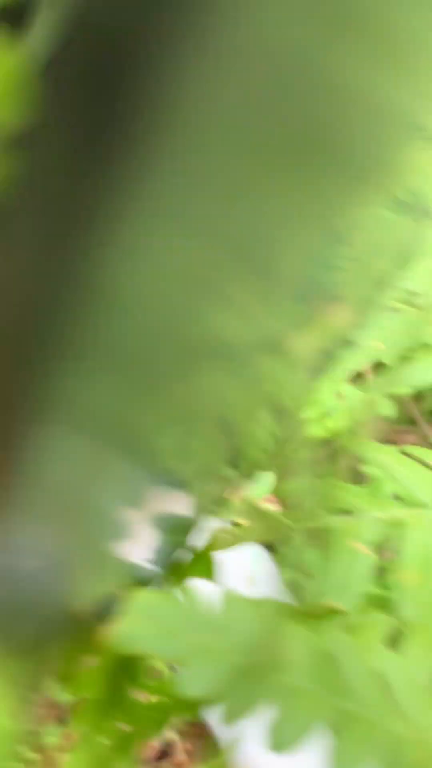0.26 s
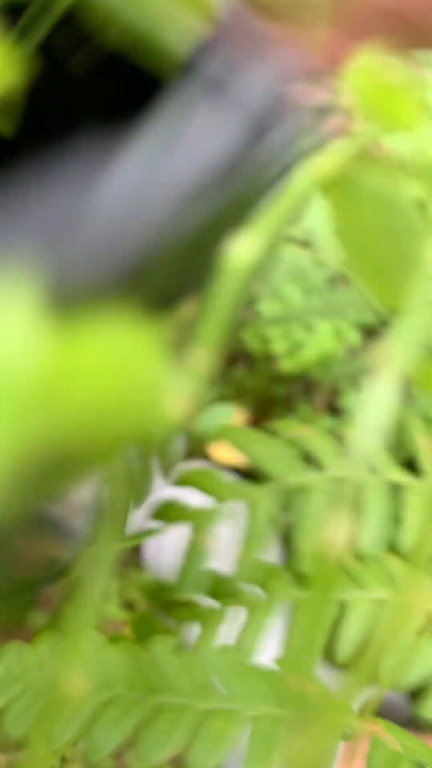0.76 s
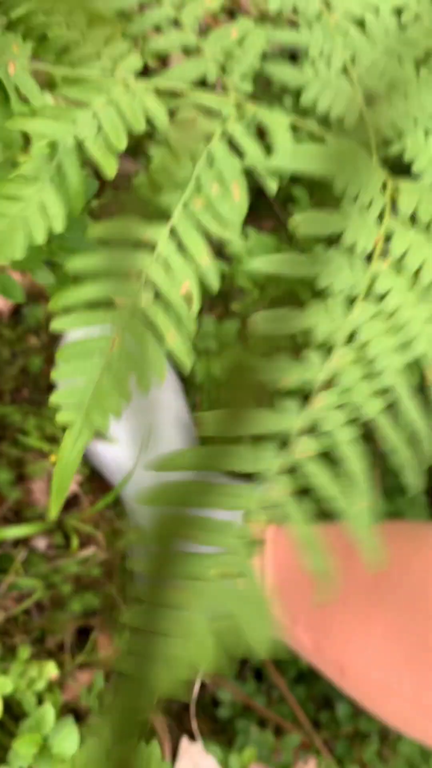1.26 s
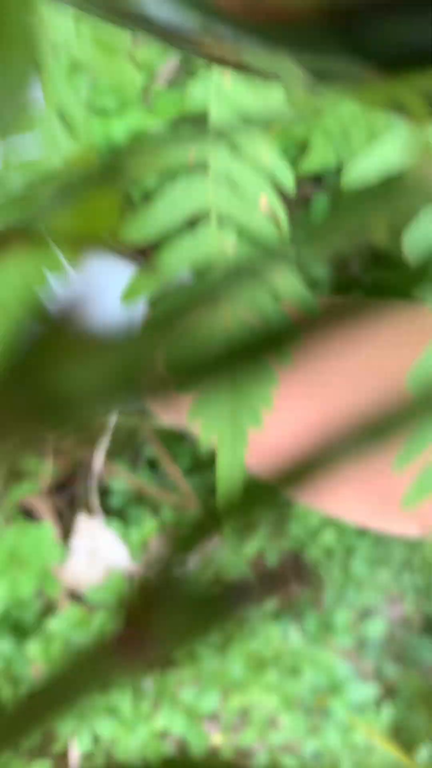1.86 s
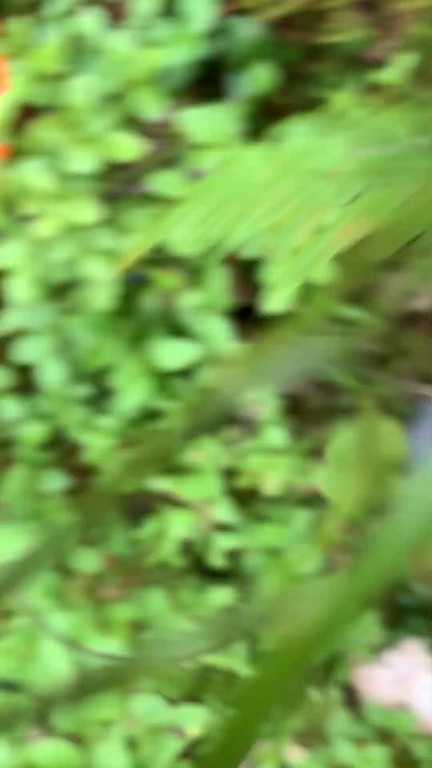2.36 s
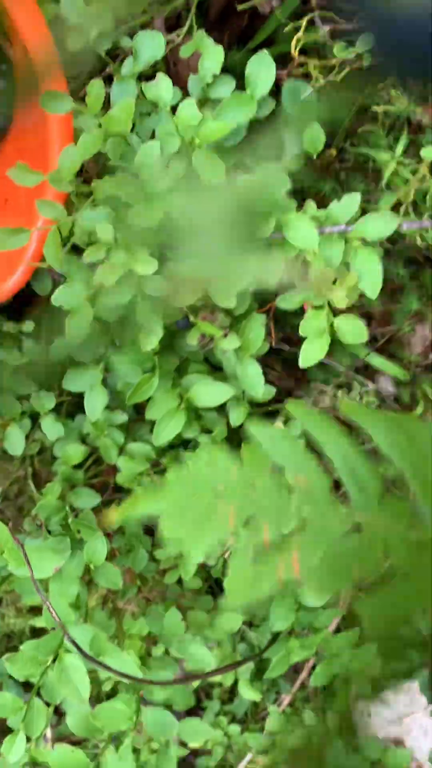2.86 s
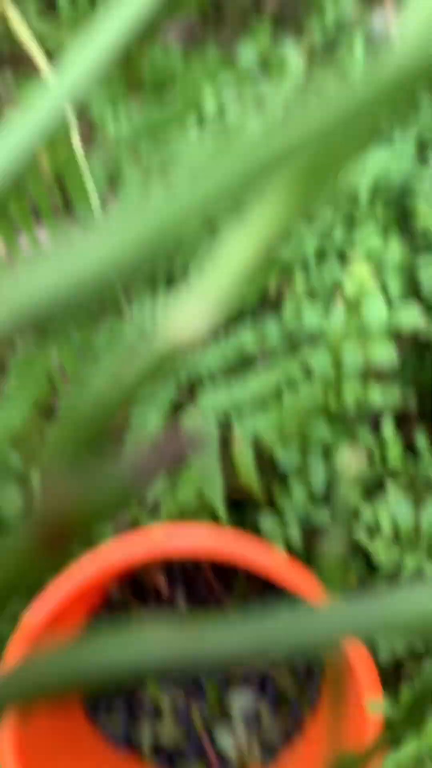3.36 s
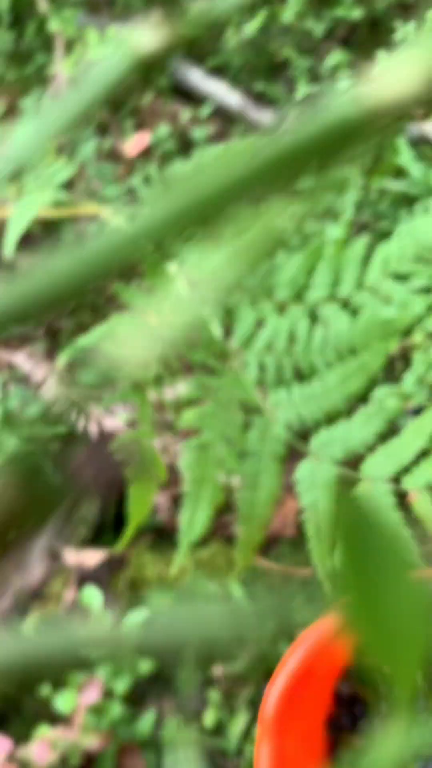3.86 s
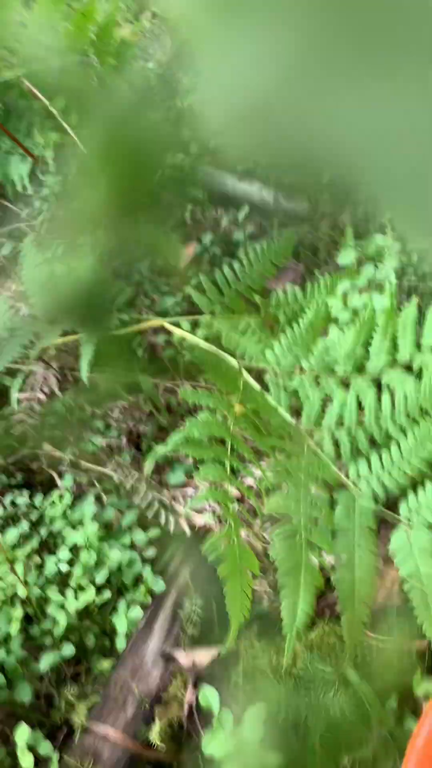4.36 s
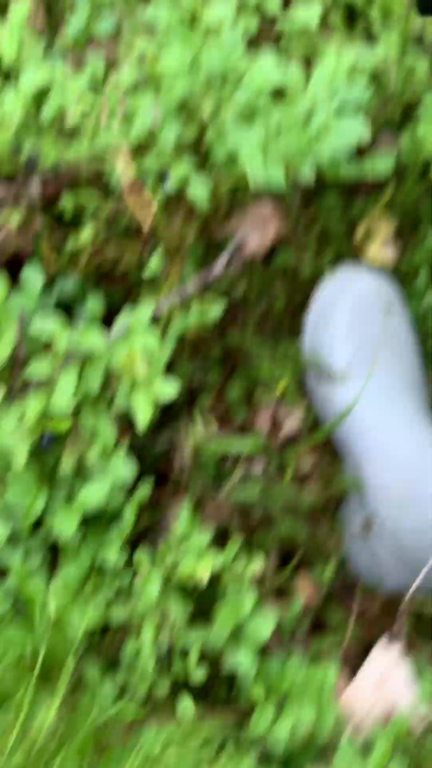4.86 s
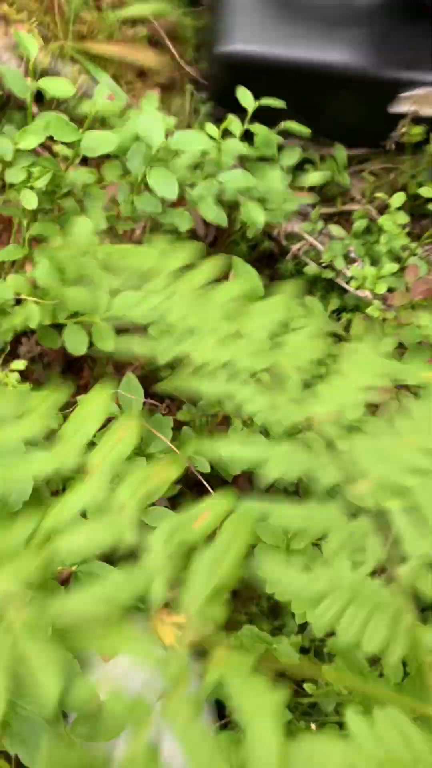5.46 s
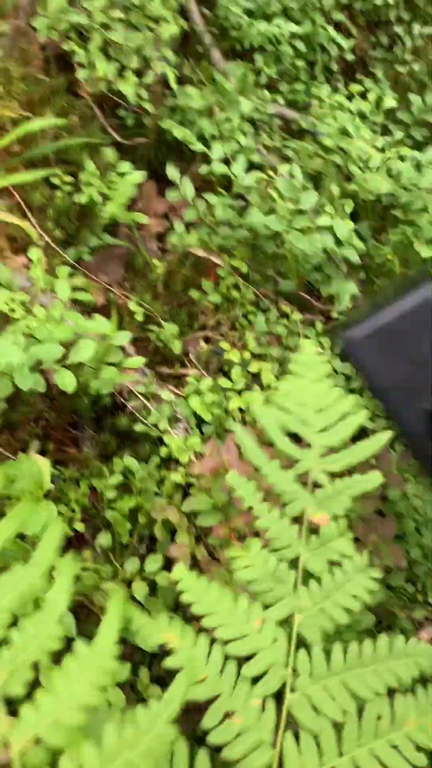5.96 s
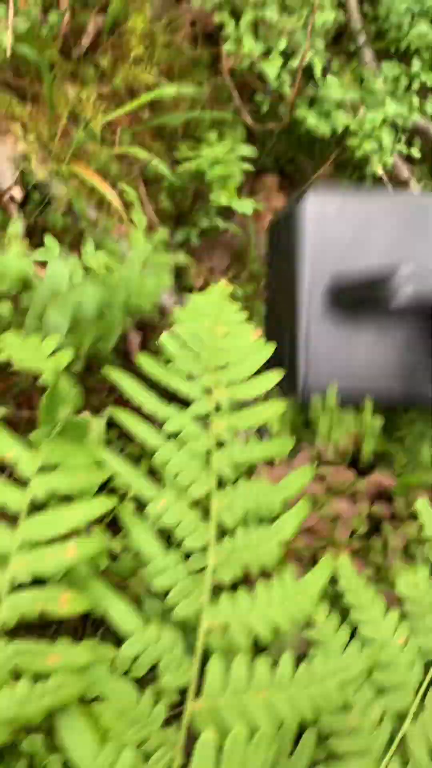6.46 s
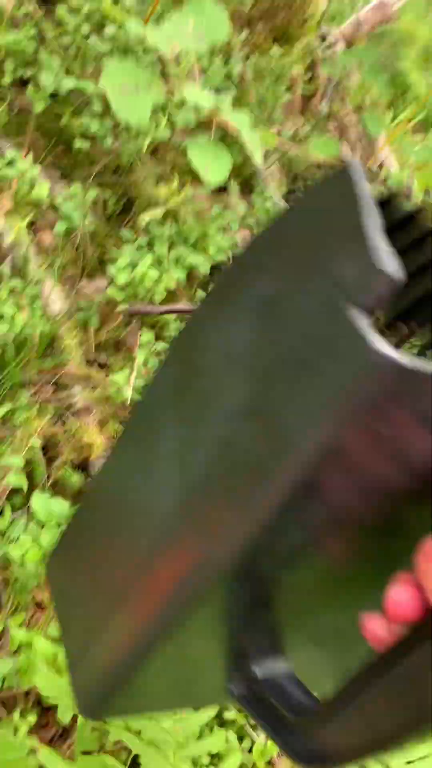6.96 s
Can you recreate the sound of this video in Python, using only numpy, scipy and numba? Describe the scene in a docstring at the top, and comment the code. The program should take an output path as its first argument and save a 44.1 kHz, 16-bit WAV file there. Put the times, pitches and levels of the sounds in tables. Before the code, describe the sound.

Very close, a person in rubber boots pushes through ferns and berry shrubs carrying a plastic bucket and scoop. A hard clatter of knocks and snapping stalks comes almost at once, then leafy swishes rise and fall unevenly, with stems scraping plastic, hollow bucket tones and woody snaps. Dull boot thuds cluster near three seconds. Later it thins to brighter fern hiss. Low handheld microphone, wide stereo, dry quiet forest.

```python
"""Ferns and berry shrubs swish and crackle as someone in rubber boots wades through, carrying a bucket and a scoop.
Leaves are band-filtered noise and clicks; stems are clicks that ring plastic; hollow air is clicks in moving resonators.
Stalks crack as fading bursts of fibre noise, knocks are falling tones, and boots in moss are low, irregular thuds.
A phone held low among the leaves hears each side of the path with a different phase between its two ports.
A faint scattered tail and steady noise of still forest air lie behind."""
import sys
import numpy as np
from scipy import signal
from scipy.fft import rfft, irfft
from scipy.io import wavfile
from numba import njit

SR = 44100
rng = np.random.default_rng(int(sys.argv[2]) if len(sys.argv) > 2 else 0)


def to_wav(s):
    """Save 16-bit WAV."""
    ch = np.atleast_2d(s).T  # columns
    pcm = np.round(np.clip(ch, -1, 1) * 32767)  # PCM
    wavfile.write(sys.argv[1], SR, pcm.astype(np.int16))


N = 317520
TIME = np.arange(N) / SR  # s
COARSE_TIME = TIME[::32]  # s, fine enough for the slow contact levels
FREQ = np.arange(N // 2 + 1) * SR / N  # Hz

# All levels in the tables are relative; the gains in the functions trim them.
# A leg or arm pushes through a clump: (peak time [s], rise [s], fall [s], leaves level [dB],
# stems on plastic level [dB], air in the bucket level [dB], grip on the phone level [dB])
SWEEPS = [(.185, .19, .3, -46, -53, -36.5, -37), (.36, 0.12, 0.45, -58, -50.5, -48, -55.5),
          (.808, 0.13, .14, -34.5, -30, -55, -42.5), (1.6, 0.27, 0.25, -45, -41.5, -48.5, -49.5),
          (1.825, 0.12, 0.2, -41, -39.5, -41.5, -41), (2.128, 0.096, 0.36, -47, -46, -51, -48.5),
          (2.448, 0.21, 0.14, -44, -41, -47, -53), (2.725, 0.072, .12, -42, -37.5, -40, -41.5),
          (2.995, 0.17, 0.13, -34.5, -35.5, -41.5, -40.5), (3.641, 0.098, 0.2, -45.5, -39, -37.5, -44),
          (3.8, 0.2, 0.085, -37, -37, -53, -51.5), (4.415, 0.12, .14, -33.5, -32.5, -47, -42.5),
          (4.65, .3, 0.16, -52, -52.5, -57.5, -58.5), (5.014, 0.038, .13, -56, -56, -69, -68),
          (5.22, 0.19, 0.12, -53, -66, -75, -66), (5.555, .3, 0.16, -42, -42, -47.5, -67),
          (6.405, 0.2, 0.22, -41, -37.5, -50.5, -74), (6.59, 0.4, 0.083, -55.5, -53, -41.5, -67.5),
          (6.914, 0.19, 0.27, -42.5, -49, -58.5, -71)]
# Single fronds brush past: (peak time [s], fall [s], leaves level [dB], stem on plastic level [dB])
FRONDS = [(0.02, 0.18, -50, -58), (0.234, 0.02, -44, -50), (0.334, 0.032, -51.5, -34),
          (0.445, 0.048, -41.5, -36), (0.499, 0.028, -42, -57), (.635, .07, -43, -46),
          (1.042, 0.16, -45.5, -46.5), (1.38, 0.084, -52, -51), (1.48, 0.21, -45.5, -69),
          (1.65, 0.062, -49, -36), (1.961, 0.035, -42.5, -43), (2.036, 0.041, -43.5, -33),
          (2.087, .025, -46.5, -43), (2.333, 0.046, -54.5, -42), (2.639, 0.12, -42, -41.5),
          (2.928, .04, -39, -37), (3.102, 0.038, -40.5, -39), (3.168, .12, -50, -40),
          (3.271, 0.084, -50, -44.5), (3.368, 0.063, -49, -52), (3.45, .1, -52.5, -48),
          (3.53, .08, -44.5, -36.5), (3.89, .05, -48.5, -42), (3.954, 0.06, -48.5, -44),
          (4.07, 0.14, -56, -49), (4.186, 0.079, -41.5, -40.5), (4.315, 0.065, -40.5, -33),
          (4.826, .12, -45, -68.5), (4.933, 0.053, -48, -61.5), (5.424, 0.049, -50.5, -64),
          (5.73, 0.069, -52, -53.5), (5.808, 0.034, -54.5, -55), (6.06, 0.062, -49, -80),
          (6.12, 0.079, -51, -60.5), (6.237, 0.21, -46.5, -56.5), (6.389, 0.043, -36.5, -48),
          (6.484, 0.03, -39.5, -36.5), (6.74, 0.028, -53, -51)]
# Between pushes: (leaves level [dB], stems level [dB], bucket level [dB], grip level [dB])
REST_LEVELS = (-67, -63.5, -78.5, -72.5)
# Leaf spectrum: (frequency [Hz], relative density [dB])
LEAF_SPECTRUM = [(150, -27), (500, -15.5), (1200, 0), (1700, 2), (2500, -1), (4000, 4.5), (5800, 2.5),
                 (8800, -0.5), (11000, 2), (16000, -1.5)]
# Soft ferns hiss more brightly than woody shrubs: (time [s], rustle tilt [dB per octave])
LEAF_TILT = [(0, -0.5), (2.4, -4.2), (3.0, -2.9), (3.6, -2), (4.4, -3), (4.85, -1.5), (5.2, 1),
             (5.55, -1.5), (5.95, 2), (6.35, -3.5), (6.6, 1), (6.9, -0.5), (7.2, -3)]
# Spectrum of stems rubbing plastic: (frequency [Hz], relative density [dB])
SCRAPE_SPECTRUM = [(200, -19), (450, 2), (700, -10), (1200, -7), (2200, -1.5), (4000, -47), (9000, -41)]
# Modes of the hollow plastic: (frequency [Hz], width [Hz], level [dB])
PLASTIC_MODES = [(427.6, 96, 4), (621, 22, -1.5), (873, 34, 2), (993, 42, 3), (1430, 71, 3.5),
                 (1604, 100, 1.5), (1882, 190, 1), (2400, 230, 0), (2700, 39, -6.5), (3280, 130, -1)]
# Twigs and stalks cracking: (time [s], level [dB], woody band relative to treble [dB], 60 dB decay [s])
CRACKS = [(0.0698, -24.5, -29, 0.074), (0.1067, -33, 4.5, 0.036), (0.1588, -9, 2.5, 0.01),
          (0.18, -24, 2, 0.032), (0.24, -22.5, -20, 0.0098), (0.297, -29.5, -18, 0.026),
          (0.353, -31, -4, 0.014), (0.7883, -28, -14, 0.04), (0.8946, -16.5, -21, 0.0045),
          (0.9926, -22.5, -13, 0.0066), (1.018, -29, -32, 0.085), (1.0595, -29, -25, 0.07),
          (1.3533, -36, -3, 0.033), (1.544, -27, -18, 0.0055), (1.628, -26, -9, 0.041),
          (1.822, -25.5, 2.5, 0.027), (1.9305, -29, 0.5, 0.031), (2.143, -27.5, -6.5, 0.042),
          (2.314, -31, -3, 0.033), (2.364, -22.5, -4, 0.0072), (2.679, -18, 7, 0.04),
          (2.758, -27.5, -8, 0.029), (2.9666, -26, -14, 0.033), (3.157, -32.5, -17, 0.022),
          (3.372, -35, -17, 0.0096), (3.5486, -19, 10.5, 0.011), (3.881, -38.5, 9, 0.044),
          (4.297, -24, -9, 0.012), (4.374, -21, -9, 0.054), (4.684, -28.5, -3, 0.047),
          (4.8027, -33.5, -18, 0.066), (5.542, -27, -23, 0.033), (5.7005, -29, -0.5, 0.0089),
          (5.729, -45, -7, 0.013), (6.037, -35.5, -21, 0.016), (6.555, -24.5, -3.5, 0.0049)]
# Bundles of stalks crushed or dragged near the phone: (time [s], length [s], rms level [dB],
# lowest frequency [Hz], highest frequency [Hz])
CRUNCHES = [(0.002, 0.04, -47.5, 547, 1140), (0.071, 0.013, -34, 110, 610), (0.097, 0.023, -39, 500, 1400),
            (0.135, 0.029, -37.5, 700, 1590), (0.1576, 0.0024, -17.5, 2670, 3650),
            (0.163, .011, -18.5, 200, 1010), (0.165, 0.0075, -23, 1300, 3360),
            (0.179, .016, -24.5, 400, 1790), (0.211, 0.045, -37, 648, 1280), (0.306, 0.016, -35, 350, 1290),
            (0.323, 0.024, -32.5, 545, 1730), (0.354, 0.011, -26, 674, 1740),
            (0.513, 0.069, -46.5, 630, 1390), (0.637, 0.034, -44.5, 546, 1140),
            (0.752, 0.013, -42.5, 129, 700), (0.798, 0.025, -43, 129, 900),
            (1.775, 0.039, -44.5, 250.4, 2200), (1.819, 0.035, -40, 270, 1510),
            (2.017, 0.037, -38, 403, 2400), (2.077, 0.019, -46.5, 301, 1405),
            (2.324, 0.016, -47.5, 301, 890), (2.674, 0.024, -33, 131.5, 638),
            (2.977, 0.042, -42, 400, 1272), (3.041, 0.036, -41.5, 248, 1010),
            (3.149, 0.032, -43.5, 2640, 4200), (3.932, 0.07, -48.5, 166, 500),
            (4.085, 0.081, -52, 220.8, 525), (4.16, 0.043, -49, 977, 2090),
            (4.311, 0.037, -42.5, 1200, 2200), (4.686, 0.018, -52, 90, 904),
            (5.721, 0.013, -49.5, 950, 2220), (5.886, 0.05, -50.5, 59.3, 815),
            (6.368, 0.047, -38, 1400, 1870), (6.442, 0.078, -42, 600, 1220),
            (6.553, 0.044, -43.5, 480, 1050), (7.083, 0.028, -41, 48.7, 336)]
# Stems and boots knocking on phone, bucket and scoop: (time [s], level [dB], first pitch [Hz],
# last pitch [Hz], time to peak [s], share through the air, not the phone's body [0-1, clipped])
KNOCKS = [(0.0769, -23.5, 900, 520, 0.002, 0), (0.109, -29, 715, 252, 0.0051, 0),
          (0.1628, -7, 1630, 1310, 0.00089, .3), (0.1632, -9, 1005, 790, 0.0029, 0),
          (0.1635, -7.5, 656, 554, 0.003, 0.05), (.183, -15.5, 908, 577, 0.003, 0),
          (0.296, -21, 1095, 130, 0.0021, 0), (.321, -20, 1300, 730, 0.0016, .3),
          (0.3544, -22, 1850, 1450, 0.0013, 0.5), (0.3566, -16, 1340, 925, 0.0019, 0),
          (.358, -28.5, 420, 340, 0.0073, 0), (.493, -27.5, 1160, 555, 0.003, 0),
          (.534, -26.5, 1105, 800, 0.0034, 0.4), (.789, -32, 610, 160, 0.0024, 0.04),
          (1.827, -25, 634, 395, 0.0024, 0.1), (1.843, -29, 476, 228, 0.0025, 0.01),
          (1.9397, -23, 890, 328, 0.00093, 0.4), (2.044, -33, 810, 484, .0025, 0.7),
          (2.134, -25, 155, 113, 0.007, 0), (2.681, -19.5, 1390, 820, 0.0028, .8),
          (2.684, -16.5, 706, 476, 0.0024, 0.8), (2.973, -26, 820, 417, 0.0038, 0.4),
          (3.5493, -12, 1730, 1520, 0.0014, 0.9), (3.552, -20, 1094, 800, 0.0026, 1.2),
          (3.5535, -14.5, 480, 434, 0.0031, 1), (4.317, -24.5, 459, 416, 0.0032, 0.7),
          (4.319, -28, 909, 750, 0.0026, 0.78), (5.532, -21, 312, 189, 0.01144, 0),
          (5.543, -25.5, 1003, 900, 0.0032, 0), (5.705, -41.5, 937, 201, 0.0026, 0),
          (5.871, -39, 955, 50.4, 0.0036, 0.04), (5.907, -35, 694, 70.3, 0.0015, 0.08),
          (7.091, -35, 256, 167.3, 0.005, .6)]
# Leaves rubbing the bucket and scoop: (peak time [s], fall [s], bucket's low note [Hz], low level [dB], #
# scoop's upper note [Hz], upper level [dB])
SCOOP_RUBS = [(1.66, 0.056, 347, -48, 916, -42.5), (2.335, 0.096, 337.5, -47, 1370, -45.5),
              (2.775, 0.056, 450, -41, 1390, -54.5), (3.74, 0.075, 442, -40.5, 1000, -64.5),
              (5.015, 0.054, 320.5, -56, 1058, -62), (5.08, .04, 365, -59, 1016, -68),
              (5.225, 0.15, 390, -56.5, 1060, -59), (5.355, 0.05, 401, -53, 1002, -64),
              (5.423, 0.025, 336, -54, 953, -45), (5.59, 0.054, 256, -60, 950, -49),
              (6.225, 0.072, 288, -53, 950, -74), (6.425, 0.089, 397.3, -38, 950, -47),
              (6.59, 0.07, 422.6, -47.5, 927, -47.5)]
# Note of the air in the bucket, lower as its opening is covered: (time [s], frequency [Hz])
BUCKET_PITCH = [(0, 421), (.8, 337), (1.8, 374), (2.25, 294), (2.75, 408), (3.6, 432), (4.0, 322.6),
                (4.35, 387), (5.3, 369), (5.55, 270), (6.3, 401), (6.9, 391.7)]
# Boots landing in moss and jolting the phone: (time [s], level [dB], pitch [Hz], time to peak [s])
STEPS = [(0.113, -30, 93.4, 0.011), (1.856, -38.5, 91, 0.011), (2.052, -37, 65, 0.0064),
         (2.698, -31, 134, 0.0036), (2.902, -28, 73, 0.005), (2.968, -21.5, 70.5, 0.0089),
         (2.996, -22.5, 63, 0.0084), (4.335, -43, 64.7, 0.0046), (5.875, -39.5, 74.7, 0.013),
         (7.074, -41, 69.9, 0.012), (7.104, -36, 50.5, 0.008)]
# Spectrum of rumble and soft ground: (frequency [Hz], relative density [dB])
RUMBLE_SPECTRUM = [(15, -30.5), (35, -5), (62, -4), (110, -1.5), (180, -5), (300, -10), (600, -28),
                   (2000, -82.5)]
# Spectrum of the still air: (frequency [Hz], relative density [dB])
AIR_SPECTRUM = [(20, -16.5), (120, -34), (400, -31.5), (1000, -15), (3000, 20), (16000, -0.5)]
# Phase between the ports, before scaling by side: (frequency [Hz], phase [rad])
PORT_PHASE = [(0, 0), (430, .6), (700, 1.6), (1000, 2.1), (2000, 2.25), (3500, 1.8), (4300, 2.25),
              (4800, 3.14), (6750, 6.28), (9000, 9.42), (13250, 15.71), (17600, 22)]

SWELL_DB, SWELL_SHAPE = 19, 1.24  # drop over one rise or fall time; a shape above 1 rounds the top
FROND_RISE = 0.69  # a frond's rise as a share of its fall
FROND_BUCKET_DB, FROND_GRIP_DB = -6, -11  # bucket and grip relative to a frond's stem
TILT_PIVOT_HZ = 6000
AIR_DB = -73.5
TOP_HZ = 16400


def undb(db):
    """Amplitude gain is the exponential of a level in decibels."""
    return np.exp(np.asarray(db) * np.log(10) / 20)


def unit(x):
    """Dividing by the root mean square gives a signal of rms 1."""
    return x / np.sqrt(np.mean(x ** 2))


def curve(table, axis):
    """Linear interpolation in time joins one column of a table."""
    rows = np.array(table)
    return np.interp(TIME, rows[:, 0], rows[:, axis])


def colour(x, points):
    """Spectral weighting shapes a sound by (frequency [Hz], level [dB]) points, then sets rms 1."""
    hz, db = np.transpose(points)
    gain = undb(np.interp(np.log(FREQ + 1), np.log(hz), db))
    return unit(irfft(rfft(x) * gain, N))


def band(x, lo_hz, hi_hz, order=2):
    """A causal Butterworth band-pass keeps one range of frequencies."""
    sos = signal.butter(order, [lo_hz, min(hi_hz, .45 * SR)], "band", fs=SR, output="sos")
    return signal.sosfilt(sos, x)


def walk(rate):
    """Smoothed random knots make a wandering of rms 1, turning about rate times a second."""
    knots = np.convolve(rng.standard_normal(N // 2), np.hanning(7), "same")
    return unit(np.interp(TIME * 3 * rate, np.arange(len(knots)), knots))


def clicks(rate, spread_db):
    """Tiny fractures form a random point process of uneven impulses, rate a second, with rms 1."""
    chance = rate / SR + np.zeros(N)
    at = np.flatnonzero(rng.random(N) < chance)
    size = np.resize(rng.standard_normal(N // 8), len(at))
    height = undb(spread_db * np.clip(size, -2, 2))
    out = np.zeros(N)
    out[at] = (-1) ** at * height / np.sqrt(chance[at])  # denser clicks are smaller: even power
    return unit(out)


def add(track, start, sound):
    """Superposition mixes a short sound into a track from a start in seconds."""
    i = max(int(start * SR), 0)
    track[i:i + len(sound)] += sound[:N - i]


@njit
def resonator(x, hz, width):
    """A state-variable band-pass acts as a resonance whose centre frequency moves."""
    y, b, l = np.empty(len(x)), 0., 0.
    for i in range(len(x)):
        g, k = np.tan(np.pi * hz[i] / SR), width / hz[i]
        v = (b + g * (x[i] - l)) / (1 + g * (g + k))
        b, l, y[i] = 2 * v - b, l + 2 * g * v, k * v
    return y


def swell(peak, rise, fall):
    """Contact power builds as a plant bends and dies as it slips free."""
    before = (peak - COARSE_TIME) / max(rise, .01)
    after = (COARSE_TIME - peak) / max(fall, .01)
    away = np.maximum(before, after)
    return undb(-SWELL_DB * away ** SWELL_SHAPE) ** 2


def contacts():
    """Powers of incoherent contacts add, giving levels in dB for leaves, stems, bucket and grip."""
    power = undb(REST_LEVELS)[:, None] ** 2
    for peak, rise, fall, *levels_db in SWEEPS:
        power = power + np.outer(undb(levels_db) ** 2, swell(peak, rise, fall))
    for peak, fall, leaf_db, stem_db in FRONDS:
        levels_db = [leaf_db, stem_db, stem_db + FROND_BUCKET_DB, stem_db + FROND_GRIP_DB]
        power = power + np.outer(undb(levels_db) ** 2, swell(peak, FROND_RISE * fall, fall))
    return [np.interp(TIME, COARSE_TIME, 10 * np.log10(p)) for p in power]


def leaves(level_db, patchy_db=1.0, flicker_db=1.5, tick_share=.25):
    """Sliding friction of fronds makes fine hiss, broad ticks and clicks in six separate bands."""
    rate = 700 * undb(.6 * (level_db + 50.5))  # a harder sweep catches more leaves
    ticks = clicks(tick_share * rate, 6.5)
    edges = np.geomspace(700, 17000, 7)  # Hz
    tilt = curve(LEAF_TILT, axis=1)
    grains = 0
    for lo, hi in zip(edges, edges[1:]):
        own = clicks(rate, 5.1) + undb(-0.5) * rng.standard_normal(N)
        tint = patchy_db * walk(29) + flicker_db * walk(120)  # each band wanders alone
        tint = tint + tilt * np.log2(np.sqrt(lo * hi) / TILT_PIVOT_HZ)
        grains = grains + band(own + undb(-10.0) * ticks, lo, hi, order=3) * undb(tint)
    return colour(grains, LEAF_SPECTRUM) * undb(level_db)


def leaf_flicks(level_db, count=1300, spread_db=8.0, cycles=6):
    """Elastic release lets single leaves and stalks ring briefly, each at its own pitch."""
    out = np.zeros(N)
    t = TIME[:SR // 25]
    for when, pitch, size, life in rng.random((count, 4)):
        hz = 1400 * 6 ** pitch
        age = t * hz / (cycles * (0.85 + life))
        db = spread_db * min(-np.log(1 - size), 3)
        ring = age * np.exp(-2 * age) * np.sin(2 * np.pi * hz * t)
        add(out, when * N / SR, undb(db) * ring)
    return unit(out) * undb(level_db)


def plastic(x):
    """Modal resonance of the hollow plastic is a sum of tuned peaks."""
    ring = 0
    for hz, width, db in PLASTIC_MODES:
        ring = ring + undb(db) * signal.lfilter(*signal.iirpeak(hz, hz / width, SR), x)
    return ring


def scrape(level_db, squeak_hz=950, width_hz=260.0):
    """Stick-slip of stems rings the plastic; a squeak slides with the point of contact."""
    rub = colour(clicks(1200, 2.8), SCRAPE_SPECTRUM)
    ring = unit(plastic(band(clicks(1200, 4.6), 570, 4200)))
    note = squeak_hz * np.exp(0.17 * walk(9.7))
    squeak = resonator(clicks(1200, 4.75), note, width_hz)
    squeak = unit(resonator(squeak, note, 2 * width_hz))
    return unit(rub + undb(2.5) * ring + undb(2.5) * squeak) * undb(level_db)


def cracks(build=0.092, onset_db=-13, onset_s=0.0028):
    """Brittle fracture: a stalk breaks with a softened onset, in a fading run of fibre and core breaks."""
    snap, wood = np.zeros(N), np.zeros(N)
    t = TIME[:SR // 6] - TIME[SR // 40]  # begins ahead of the listed time to hold the soft onset
    fibres = unit(band(clicks(8400, 0.74), 3000, 11600, order=1))
    core = unit(band(clicks(7900, 1.55), 1000, 3330))
    for start, db, wood_db, t60 in CRACKS:
        age = np.maximum(t, 0) / max(t60, .004)  # in decay times, as is build
        onset = undb(onset_db) * np.exp(-np.abs(t) / onset_s)
        fade = undb(db - 60 * age) * (onset + 1 - np.exp(-age / build))
        add(snap, start + t[0], fade)
        add(wood, start + t[0], fade * undb(wood_db))
    return undb(-2.5) * snap * fibres + undb(-4.0) * wood * core


def crunches(rate=1100, spread_db=0.5, clump_db=3.5, rub_db=-7, shape=0.21):
    """Intermittent slip of stalks comes in coarse clusters of jerks, limited to each bundle's band."""
    out = np.zeros(N)
    slips = clicks(rate, spread_db) + undb(rub_db) * rng.standard_normal(N)
    slips = slips * undb(clump_db * walk(110))
    t = TIME[:SR // 8]
    for start, length, db, lo_hz, hi_hz in CRUNCHES:
        part = np.clip(t / length, 0, 1)
        load = (part * (1 - part)) ** shape
        own_slips = np.roll(slips, -int(start * SR))[:len(t)]
        burst = band(own_slips * load, lo_hz, hi_hz)
        burst = signal.sosfilt(signal.butter(6, hi_hz, fs=SR, output="sos"), burst)  # steep top
        add(out, start, undb(db) * burst * np.sqrt(length * SR / np.sum(burst ** 2)))
    return out


def knocks(rough=1.0, grit=0.12, hard_s=0.0021):
    """Dispersion of bending waves: high ones arrive first, so pitch drops; returns body and air paths."""
    body, air = np.zeros(N), np.zeros(N)
    t = TIME[:SR // 8]
    chatter, grain = walk(300), walk(4000)
    for start, db, first_hz, last_hz, rise, airborne in KNOCKS:
        pitch = last_hz + (first_hz - last_hz) * np.exp(-t / (1.6 * rise))
        turns = np.cumsum(pitch) / SR
        envelope = (t / rise) * np.exp(1 - t / rise)
        contact = start + turns / 600  # the contact chatters in step with the vibration
        hardness = min(1, hard_s / rise)  # a soft, slow blow chatters less
        jitter = rough * hardness * np.interp(contact, TIME, chatter)
        wave = np.sin(2 * np.pi * turns + jitter)
        blow = undb(db - 7.0) * envelope * (wave + grit * np.interp(contact, TIME, grain))
        share = np.clip(airborne, 0, 1)
        add(body, start, (1 - share) * blow)
        add(air, start, share * blow)
    return body, air


def scoop(low_width_hz=50.0, upper_width_hz=85.0, sway=0.013):
    """Cavity resonance: rubs sound the low note of the bucket's air and an upper note of the scoop, which shift
    as leaves cover their mouths."""
    low_power, upper_power = 1e-12, 1e-12
    for peak, fall, _, low_db, _, upper_db in SCOOP_RUBS:
        contact = swell(peak, FROND_RISE * fall, fall)
        low_power = low_power + undb(low_db) ** 2 * contact
        upper_power = upper_power + undb(upper_db) ** 2 * contact
    low_hz, upper_hz = curve(SCOOP_RUBS, axis=2), curve(SCOOP_RUBS, axis=4)
    out = 0
    for hz, width, power in [(low_hz, low_width_hz, low_power), (upper_hz, upper_width_hz, upper_power)]:
        note = hz * np.exp(sway * walk(12.0))
        air = resonator(clicks(1500, 2.7), note, width)
        air = resonator(air, note, 3.9 * width)
        out = out + unit(air) * np.interp(TIME, COARSE_TIME, np.sqrt(power))
    return out


def hollow(level_db, width_hz=65.0, sway=0.14):
    """Cavity resonance: brushing the wall sounds the bucket's air, whose note wavers as it swings."""
    pitch = curve(BUCKET_PITCH, axis=1) * np.exp(sway * walk(5.3))
    air = resonator(clicks(1500, 4.8), pitch, width_hz)
    air = resonator(air, pitch, 460.0)
    return unit(air) * undb(level_db)


def steps(rough=0.58):
    """Damped impact: the sole presses soft moss in a dull, irregular thud."""
    out = np.zeros(N)
    t = TIME[:SR // 4]
    ground = colour(rng.standard_normal(N), RUMBLE_SPECTRUM)
    for start, db, hz, rise in STEPS:
        own_ground = np.roll(ground, -int(start * SR))[:len(t)]
        wave = np.sin(2 * np.pi * hz * t) + rough * own_ground
        add(out, start, undb(db) * (t / rise) * np.exp(1 - t / rise) * wave)
    return band(out, 7.4, 700)


def grip_rumble(level_db):
    """Structure-borne sound: the grip on the phone gives low noise that follows the contacts."""
    return colour(rng.standard_normal(N), RUMBLE_SPECTRUM) * undb(level_db + 2.33)


def forest(x, t60=0.11):
    """Diffuse scattering by ground, body and trunks gives each port its own short tail (t60 in s)."""
    t = TIME[:SR // 2]
    tail = rng.standard_normal((2, len(t))) * undb(-60 * t / t60)
    return signal.fftconvolve(x[None], tail / np.linalg.norm(tail[0]), axes=1)[:, :N]


def still_air():
    """Stationary noise, independent at each port, stands for the still forest air."""
    noise = [colour(rng.standard_normal(N), AIR_SPECTRUM) for _ in range(2)]
    return undb(AIR_DB) * np.array(noise)


def ports(x, side, mono_hz=480):
    """Phase difference places a sound left (side > 0) or right (side < 0); the deep bass stays in phase."""
    bass_release = FREQ ** 4 / (FREQ ** 4 + mono_hz ** 4)
    phase = side * np.interp(FREQ, *np.transpose(PORT_PHASE)) * bass_release
    return irfft(rfft(x) * np.exp(np.outer([.5j, -.5j], phase)), N)


def scene():
    """Superposition of plants on both sides, blows close to the phone, and still forest air."""
    leaf_db, stem_db, bucket_db, grip_db = contacts()
    catch, snag = walk(70), walk(22)  # leaves catch and let go quickly, whole stems more slowly
    swish_db = leaf_db + 1.9 * catch + 0.6 * snag
    scrape_db = stem_db + 2.8 * catch + 1.7 * snag

    left = undb(-2.5) * leaves(swish_db) + undb(-7) * scrape(scrape_db)
    left = left + undb(-13) * leaf_flicks(swish_db)
    right = undb(-2.5) * leaves(swish_db) + undb(-5.0) * scrape(scrape_db)
    right = right + undb(-14.0) * leaf_flicks(swish_db)

    lows = grip_rumble(grip_db + 2.5 * snag) + steps()
    lows = lows + undb(-4.0) * hollow(bucket_db + 1.4 * snag)
    snaps = cracks()
    body_blows, air_blows = (blow + undb(-0.5) * plastic(blow) for blow in knocks())
    touching = body_blows + crunches() + scoop() + lows
    near = snaps + undb(-7.0) * plastic(snaps) + air_blows

    scattered = band(left + right + near + touching, 1100, 23000, order=1)
    echo_left, echo_right = undb(-9.5) * forest(scattered)
    return (ports(touching, side=0.86, mono_hz=1030) + ports(left + near + echo_left, side=0.93)
            + ports(right + echo_right, side=-1.127) + still_air())


def record(dry):
    """Band limitation: the phone cuts the top with a steep elliptic low-pass."""
    return signal.sosfilt(signal.ellip(10, .2, 80, TOP_HZ, fs=SR, output="sos"), dry)


dry = scene()
out = record(dry)
to_wav(out)
```